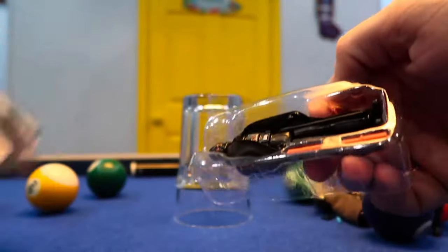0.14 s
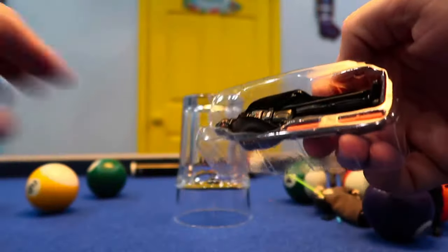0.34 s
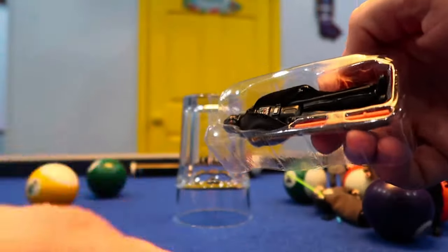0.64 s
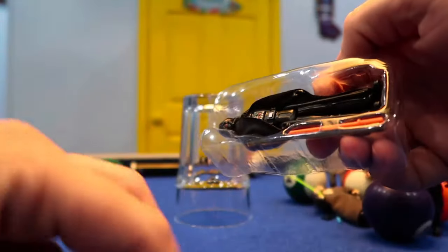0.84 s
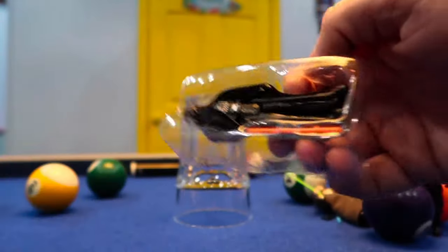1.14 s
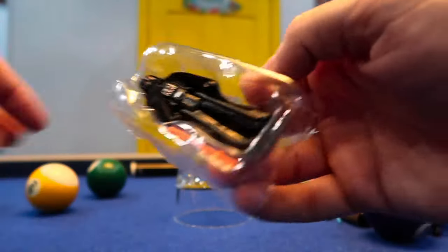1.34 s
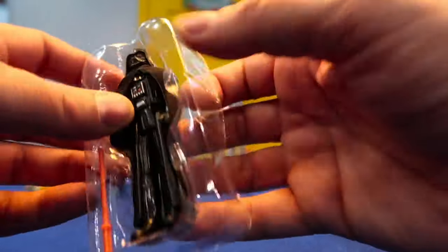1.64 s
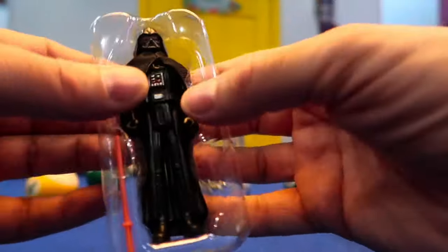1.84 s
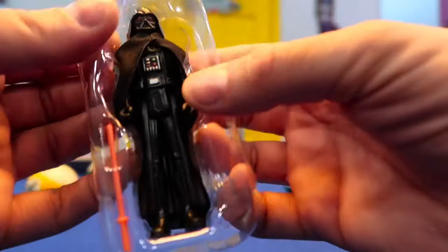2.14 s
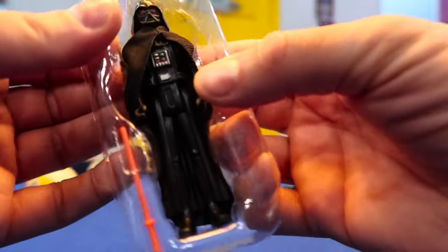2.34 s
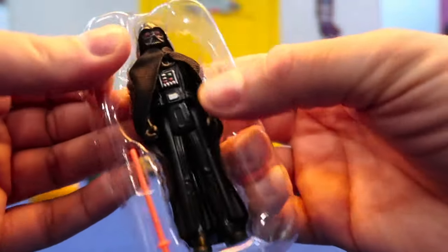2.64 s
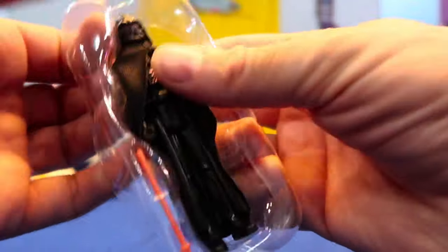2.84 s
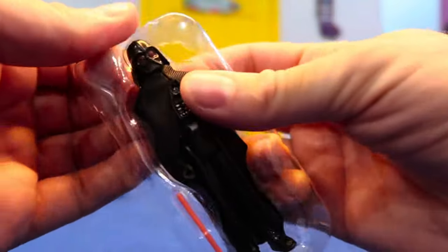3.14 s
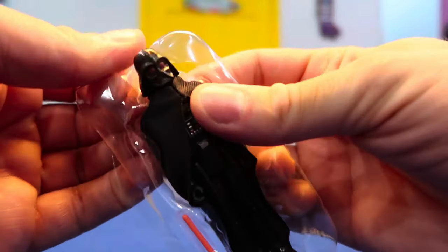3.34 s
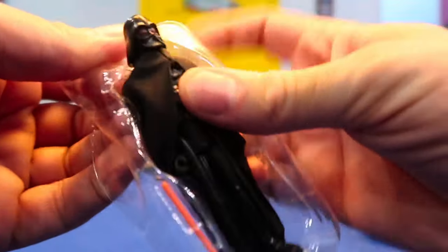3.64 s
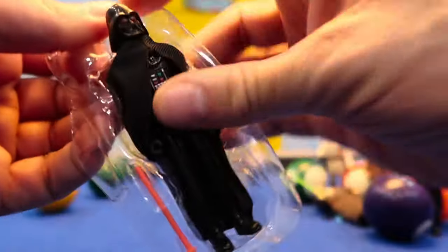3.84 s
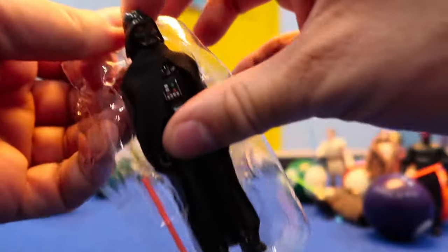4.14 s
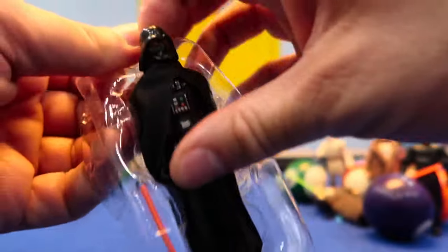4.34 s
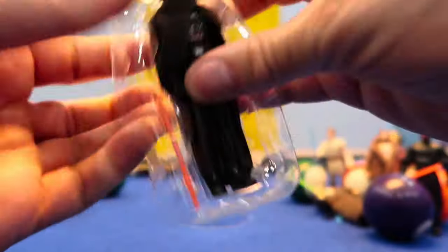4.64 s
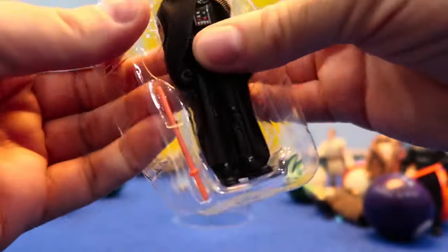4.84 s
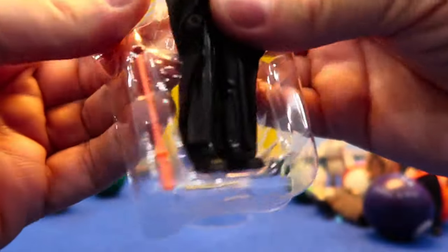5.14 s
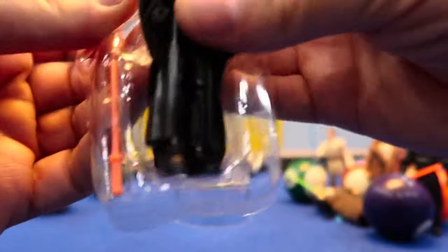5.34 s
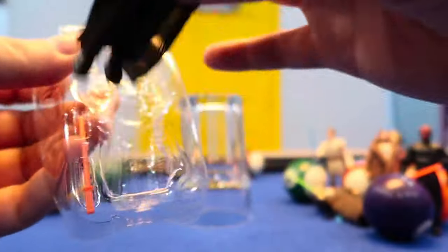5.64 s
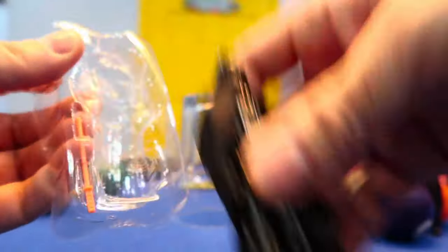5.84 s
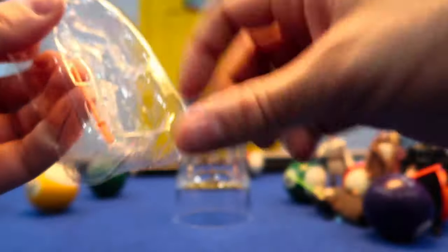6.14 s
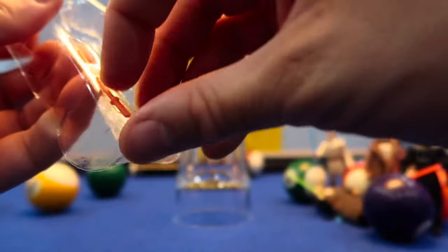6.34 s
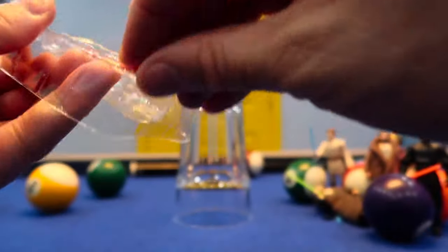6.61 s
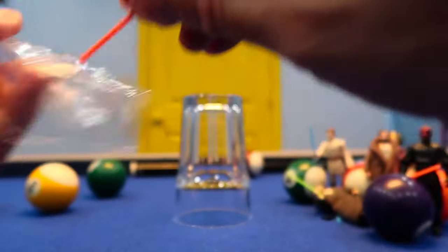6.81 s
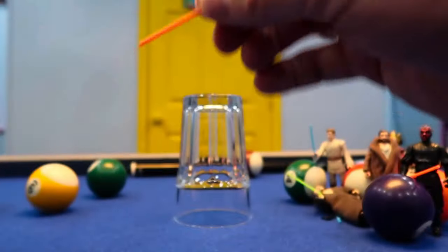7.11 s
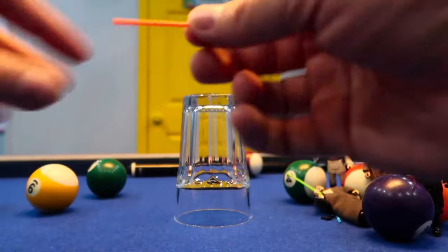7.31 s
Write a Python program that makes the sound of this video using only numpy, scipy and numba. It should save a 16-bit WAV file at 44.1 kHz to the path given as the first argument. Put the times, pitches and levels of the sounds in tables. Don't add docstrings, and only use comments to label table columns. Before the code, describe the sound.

In a small room with low ventilation rush and faint hum, a light lid clatters and knocks dully on a felt table, slightly left. A finger hisses briefly across the cloth, and the lid knocks again. Then a thin plastic shell is flexed close to the microphone: hard snaps, rapid stick-slip creaks and fine crackle in dense bursts, thinning to a few late clicks.

```python
import sys
import numpy as np
from scipy import signal
from scipy.fft import rfft, irfft, next_fast_len
from scipy.io import wavfile
from scipy.ndimage import uniform_filter1d
from numba import njit

SR = 44100
rng = np.random.default_rng(int(sys.argv[2]) if len(sys.argv) > 2 else 0)


def linear_from_db(decibels):
    return 10 ** (np.asarray(decibels, float) / 20)


def materialize(psi):
    bounded = np.clip(np.atleast_2d(psi).T, -1, 1)
    quanta = np.round(bounded * 32767).astype(np.int16)
    wavfile.write(sys.argv[1], SR, quanta)


N = 329556
TIME = np.arange(N) / SR


def colour(x, points):
    hz, db = np.transpose(points)
    size = x.shape[-1]
    f = np.arange(size // 2 + 1) * SR / size + 1
    return irfft(rfft(x) * linear_from_db(np.interp(np.log(f), np.log(hz), db)), size)


@njit
def ring(start, pole, rise, left, right):
    out = np.zeros((2, N))
    for g in range(len(start)):
        z, gap, i = 1. + 0j, 1., start[g]
        while abs(z) > 1e-3 and i < N:
            v = z * (1 - gap)
            out[0, i] += (v * left[g]).imag
            out[1, i] += (v * right[g]).imag
            z, gap, i = z * pole[g], gap * rise, i + 1
    return out


PORT_LEAD_RAD, PORT_LEAD_HZ, PORT_BEND, PORT_SCATTER = 2.92, 12300.0, 1.61, 0.6
RUN_POWER, PAN_SCATTER_DB = 3.0, -2


def strike(s, db, hz, t60_s, pan_db, spread_oct, tilt_db_oct, run_s, rise_s, count):
    u = rng.random((len(s), count + 1, 4))
    late = u[:, 1:, 0] ** RUN_POWER
    size = u[:, 1:, 2]
    phase = np.exp(2j * np.pi * u[:, 1:, 3])
    octave = spread_oct * (2 * (np.arange(count) + u[:, 1:, 1]) / count - 1)
    f = np.clip(hz[:, None] * 2 ** octave, 30, .45 * SR)

    side = 1 + PORT_SCATTER * np.sqrt(3) * (2 * u[:, :1, 0] - 1)
    lead = np.exp(.5j * side * PORT_LEAD_RAD * (f / PORT_LEAD_HZ) ** PORT_BEND)
    pan = linear_from_db((pan_db + PAN_SCATTER_DB * (2 * u[:, 0, 1] - 1)) / 2)[:, None]
    mode_db = db[:, None] - 9.4 * size + tilt_db_oct * np.abs(octave)
    gain = phase * linear_from_db(mode_db) * 2.566 / np.sqrt(count)

    decay = np.log(1000) * 2 ** (0.086 * octave) / (np.clip(t60_s, .001, .4) * SR)
    pole = np.exp(2j * np.pi * f / SR - decay)
    rise = np.exp(-1 / (rise_s * SR))
    start = ((s[:, None] + run_s * late) * SR).astype(np.int64)
    left, right = gain * lead * pan, gain / lead / pan
    return ring(start.ravel(), pole.ravel(), rise, left.ravel(), right.ravel())


def shell(s, panel_db, panel_hz, belly_db, edge_db, count):
    panel = strike(s, panel_db + 2.0, panel_hz, t60_s=0.013, pan_db=0.36, spread_oct=0.99,
                   tilt_db_oct=-12.5, run_s=.0022, rise_s=.0001, count=count)
    belly = strike(s, belly_db + 5.0, 750 + 0 * s, t60_s=0.012, pan_db=0.43, spread_oct=1.0,
                   tilt_db_oct=-9.0, run_s=0.002545, rise_s=0.0003, count=count)
    edge = strike(s, edge_db + 4.0, 5500 + 0 * s, t60_s=0.006, pan_db=0.5, spread_oct=1.168,
                  tilt_db_oct=-2.5, run_s=0.0014, rise_s=.00006, count=count)
    return panel + belly + edge


# t/s, peak level/dB, panel
# f/Hz, edge re panel/dB
TICKS = [(1.823, -22.5, 2720, 4), (1.953, -16, 2240, -11), (1.9928, -17.5, 2930, -8),
         (2.056, -22, 2580, -15), (2.133, -13.5, 2280, -11), (2.2932, -19.5, 2220, -3),
         (2.6036, -10, 2340, -21), (2.7247, -32, 2110, 14.5), (2.8961, -12, 2003, -21),
         (3.0254, -19, 2150, -24.5), (3.2729, -9.5, 2872, -12), (3.403, -20.5, 2554, -4.5),
         (3.4303, -16.5, 3180, -9), (3.4801, -12.5, 2670, -20.5), (3.8257, -12.5, 3920, -39),
         (3.943, -20, 2213, -10.5), (4.0173, -21.5, 2260, -6), (4.0466, -14, 2190, -23),
         (4.0965, -24, 2174, -4.5), (4.6706, -17.5, 2025, -18), (4.704, -21.5, 2240, -11),
         (4.7883, -20, 2546, -1.5), (4.991, -13.5, 3560, -16), (5.007, -16.5, 2500, -13.5),
         (5.0692, -17, 2950, -1.5), (5.2651, -10.5, 3210, -20), (5.3551, -20, 3000, -6),
         (5.506, -21, 2780, 2), (5.5135, -13.5, 2730, -4.5), (5.651, -23.5, 2220, -6.5),
         (5.8992, -41, 2440, -18), (6.0542, -23.5, 2900, -9), (6.1897, -32.5, 2960, -20),
              (6.3335, -45.5, 2342, -15), (6.588, -37.5, 2407, -5), (6.6238, -16.5, 4190, 4),
              (6.7897, -12, 2880, -10), (6.8105, -18.5, 1530, -26), (5.617, -10.5, 2184, -30),
              (6.9411, -9, 2220, -14.5), (6.9824, -10.5, 2940, -2), (7.0588, -13, 2120, -20)]
TICK_BELLY_DB, BELLY_PER_DB, BELLY_SCATTER_DB = -17.5, -0.15, 18.5


def ticks():
    s, db, hz, edge_db = np.transpose(TICKS)
    belly_db = TICK_BELLY_DB + BELLY_PER_DB * db + BELLY_SCATTER_DB * (rng.random(len(s)) - .5)
    return np.transpose([s, db, hz, belly_db, edge_db])


# start t/s, length/s, slip rate/Hz, peak level/dB, edge re panel/dB
CREAKS = [(2.405, .04, 71, -28.5, -23.5), (2.462, .03, 80, -17, -28), (2.5052, .032, 117, -14.5, -18),
          (2.546, .04, 94, -20, -19), (2.67, .03, 157, -12.5, -11), (3.054, .01, 49, -9, -9.5),
          (3.0658, .024, 66.6, -14.5, -10), (3.138, .009, 186, -8, -19), (3.169, .036, 92, -13, -12.5),
          (3.222, .03, 45, -14, -2.5), (3.77, .045, 134, -41.5, 14), (3.849, .06, 47, -34, 8.5),
          (4.246, .065, 118, -20, -13), (4.38, .035, 133, -35, 7), (4.47, .035, 110, -31, -13),
          (4.847, .01, 70, -13, -8), (5.165, .03, 93, -15.5, -5.5), (5.4127, .01, 156, -12.5, -30)]
CREAK_HZ, CREAK_BELLY_DB, CREAK_SCATTER_DB, CREAK_UNEVEN = 2350, -12.5, 4.5, 0.15


def creaks(count=10):
    start, length, rate, db, edge_db = np.transpose(CREAKS)[:, :, None]
    u = rng.random((len(CREAKS), count, 4)) - .5
    slip = np.arange(count)
    late = (slip + CREAK_UNEVEN * u[..., 0] * (slip > 0)) / rate
    rows = [start + late,
            db + CREAK_SCATTER_DB * u[..., 1],
            CREAK_HZ * 2 ** (0.23 * u[..., 2]),
            CREAK_BELLY_DB + 12 * u[..., 3],
            edge_db + 0 * late]
    return np.stack(rows, axis=-1)[late < length]


# t/s, peak level/dB, panel f/Hz, belly re panel/dB, edge re panel/dB
SNAPS = [(1.5, -10, 3720, -13.5, -14), (1.604, 1, 2650, -16.5, -8), (1.707, -7, 2610, -12, -13),
         (2.322, -2.5, 2800, -16, -12), (2.3869, -3.5, 2320, -19.5, -5.5), (2.498, -10, 2460, -9.5, -5.5),
         (2.5898, -9.5, 2560, -18.5, -32), (2.7461, -12.5, 3560, -1, -10), (3.0457, -6, 2435, -10.5, -6),
         (3.1202, -6.5, 2300, -25, -24), (3.2893, 0.5, 2130, -8.5, -2.5), (3.4922, -8.5, 3930, -26, -6),
         (3.5917, -5, 1754, -13, -6.5), (3.6984, -19.5, 1910, 2.5, -1.5), (4.1536, -6.5, 2200, -24.5, -5.5),
         (4.5145, -1.5, 2026, -10, -6), (4.5983, -12, 3080, -13, -6.5), (4.72, -5, 2140, -17, -13.5),
         (4.821, -15, 2670, -2, 0.5), (4.878, -7, 2350, -12.5, -8.5), (5.018, -3, 3056, -25.5, -8),
         (5.4033, -9.5, 3190, -15, -0.5), (5.453, -12, 2185, -14, -12), (5.6072, -8.5, 2140, -22, -13.5)]


def snaps():
    s, db, hz, belly_db, edge_db = np.vstack([SNAPS, ticks(), creaks()]).T
    u = rng.random((len(s), 2))
    slip_s = s - .002 - 0.0031 * u[:, 1]
    slip_db = db - 17 - 12 * u[:, 0]
    slip = shell(slip_s, slip_db, hz, slip_db + belly_db, slip_db + edge_db, count=5)
    return slip + shell(s, db, hz, db + belly_db, db + edge_db, count=14)


# t/s, peak level/dB, panel f/Hz, belly re panel/dB, edge re panel/dB
CRINKLES = [(1.484, -29.5, 1820, -6, -15), (1.5901, -17, 3020, -10.5, -22.5), (1.888, -32, 3010, -9, -11.5),
            (1.936, -29, 2930, -1, 1), (1.978, -24, 1970, 1, -11.5), (2.113, -31, 1720, 5, -24),
            (2.1785, -23, 2090, -10.5, -27), (2.1826, -20.5, 1960, -1, -30),
            (2.207, -20.5, 3080, -15.5, -5), (2.222, -19.5, 2130, -12, -18.5),
            (2.2605, -29, 2980, -13.5, -6.5), (2.797, -14.5, 1870, -4.5, -20.5),
            (2.8093, -26.5, 2150, -8.5, -16), (2.831, -20.5, 2200, -13, -20), (2.872, -22, 1780, -4, -23),
            (2.9177, -26.5, 1810, 0, -23), (2.996, -36, 2160, -3.5, -14.5), (3.035, -13.5, 1990, -13, -36),
            (3.102, -12, 3310, -20.5, -15.5), (3.1543, -18.5, 2680, -4, -21),
            (3.4114, -20, 3050, -18, -10.5), (3.42, -23.5, 2500, -7.5, -4.5),
            (3.4605, -20, 1990, -7.5, -22), (3.4752, -9.5, 2400, -16, -10), (3.5122, -22, 2430, -17, -3),
            (3.547, -29, 3260, -19, 4), (3.6318, -16.5, 2170, -19.5, -4.5), (3.653, -23.5, 2200, -9, -12.5),
            (3.6673, -23, 2150, -4, -10), (3.676, -17.5, 2280, -2, -17), (3.7396, -23.5, 1990, -20, -20),
            (4.137, -25.5, 2040, -18, -16), (4.29, -15.5, 2240, -3, -18), (4.294, -15.5, 3400, -12.5, 1.5),
            (4.4258, -18.5, 1980, -23.5, -17), (4.4462, -20.0, 1990, -15, -12),
            (4.498, -13.5, 2160, -17, -9), (4.5088, -8.5, 2240, -18, -19.5),
            (2.7, -7, 2450, -6, -12), (2.714, -13, 2280, -10, -22.5), (4.561, -23, 2680, -11, -9),
                 (4.5658, -15.5, 2470, -16, -9), (4.606, -14, 2013, -16, -17), (4.6156, -19, 2270, 1, -18),
                 (4.6373, -20, 1970, -2.5, -16), (4.651, -16.5, 1980, -12.5, -23),
                 (4.8619, -6, 2620, -19.5, -7.5), (4.888, -14.5, 2160, -17, -18),
                 (4.913, -21, 2310, -18, -15), (4.9533, -23.5, 2350, -23.5, -22),
                 (4.9668, -19, 2470, -11.5, -20), (4.978, -19, 2600, -16, -26.5),
                 (5.014, -9.5, 3570, -22, -7), (5.0297, -16, 2440, -12.5, -18),
                 (5.08, -17, 2710, -26.5, -22), (5.09, -19.5, 2590, -22, -21),
                 (5.1113, -22, 2350, -15.5, -17), (5.1205, -21, 2277, -17, -21),
                 (5.1516, -15, 2340, -19, -19), (5.186, -21.5, 2350, -22, -4), (5.231, -24, 2327, -25, -15),
                 (5.2757, -18, 2400, -8.5, -8), (5.3144, -26.5, 3010, -16, -8),
                 (5.3487, -18.5, 2670, -18, -13), (5.364, -26, 3270, -24, -7),
                 (5.4758, -15.5, 1890, -20.5, -13), (5.483, -24.0, 1960, -9, -12),
                 (5.5466, -20, 2960, -0.5, -9), (5.6371, -29, 1880, 10, -8), (6.6005, -32.0, 2460, -3, -5),
                 (6.8211, -31, 3300, -8, -8), (6.834, -20, 2560, -15, -6), (6.845, -30, 1940, -15, -15),
                 (6.8728, -18, 2650, -25, -13), (7.166, -34, 2860, -5, -8), (7.341, -24.5, 3040, -17, -9)]
CRINKLE_DB = -3


def crinkles():
    s, db, hz, belly_db, edge_db = np.transpose(CRINKLES)
    db = db + CRINKLE_DB
    return shell(s, db, hz, db + belly_db + 3.0, db + edge_db + .7, count=10)


# start t/s, hold/s, level/dB, brightness/dB
SQUEEZES = [(1.487, 0.12, -30, -2), (1.755, 0.093, -26.5, 0), (1.915, 0.109, -30.5, -4),
            (2.166, 0.037, -26.5, -4), (2.289, 0.05, -19, -3), (2.43, 0.084, -27.5, 7.5),
            (2.691, 0.023, -16.5, 1.5), (2.77, 0.0308, -26, -4), (2.994, 0.051, -24.5, -3),
            (3.175, 0.057, -29, 3), (3.425, 0.087, -30, 5), (3.6, 0.07, -22, 8.5), (3.753, .12, -25, 6),
            (4.01, 0.051, -32.5, -5), (4.147, 0.12, -32, 9.5), (4.314, 0.14, -37.5, 13),
            (4.445, 0.16, -24, 2), (4.799, 0.24, -28, 2.5), (5.023, 0.2, -29.5, 1),
            (5.164, 0.058, -27, 13.5), (5.313, 0.026, -30, 10.5), (5.46, 0.081, -26, -5),
            (5.629, 0.064, -35, 2), (6.057, 0.026, -38.5, -4), (6.607, 0.039, -26.5, -4),
            (6.79, 0.044, -23, 3.5), (6.99, 0.16, -28, 1.5), (7.345, 0.031, -33, 2)]
SQUEEZE_RISE_DB_S, SQUEEZE_FALL_DB_S = 598.5, 155.5
FINE_BELLY_DB, FINE_EDGE_DB, BELLY_PER_BRIGHT = -6.5, -17, -0.34


def crackle(count=1400):
    start, hold, db, bright_db = np.transpose(SQUEEZES)[:, :, None]
    u = rng.random((count, 5))
    s = start[0] + (N / SR - start[0]) * u[:, 0]
    size_db = -3.3 * np.log(1 - .97 * u[:, 1]) - 7
    rise_db = SQUEEZE_RISE_DB_S * np.maximum(start - s, 0)
    fall_db = SQUEEZE_FALL_DB_S * np.maximum(s - start - hold, 0)
    grip_db = db - rise_db - fall_db

    def heard(more_db):
        return 20 * np.log10(linear_from_db(grip_db + more_db).max(axis=0)) + size_db

    panel_db = heard(0)
    belly_db = heard(FINE_BELLY_DB + BELLY_PER_BRIGHT * bright_db) + 6 * u[:, 3] - 3
    edge_db = heard(FINE_EDGE_DB + bright_db) + 12 * u[:, 4] - 6
    return shell(s, panel_db, 2000 * 2 ** (0.39 * u[:, 2]), belly_db, edge_db, count=6)


# t/s, peak level/dB, f/Hz
FLICKS = [
    (.318, -31, 10500),
    (2.953, -30, 6400),
    (3.316, -16.5, 6350),
    (3.987, -27.5, 6500),
    (4.058, -27.5, 6460),
    (4.311, -17.5, 5400),
    (4.752, -25, 6500),
    (5.327, -22, 6530),
    (6.875, -21.5, 6430),
]


def flicks():
    s, db, hz = np.transpose(FLICKS)
    return strike(s, db + 1, hz, t60_s=0.0036, pan_db=0.3967, spread_oct=.9,
                  tilt_db_oct=1.5, run_s=0.00068, rise_s=.00006, count=12)


RUB_S, RUB_LENGTH_S, RUB_HZ, RUB_DB = 5.17, 0.093, 7430, -39


def rub():
    hiss = colour(rng.standard_normal(N), [(RUB_HZ / 1.8, -25), (RUB_HZ, 0), (RUB_HZ * 1.12, -20)])
    stroke = np.sin(np.pi * np.clip((TIME - RUB_S) / RUB_LENGTH_S, 0, 1)) ** .5
    return hiss / np.std(hiss) * linear_from_db(RUB_DB) * stroke


# t/s, peak level/dB, f/Hz, upper re lower ring/dB
LID = [(0.212, -41, 447, -3.5), (0.274, -25.5, 443, -11), (0.339, -18, 1200, -40), (0.355, -14.5, 676, -8),
       (0.38, -34, 910, -32), (0.429, -12, 586, -0.5), (0.447, -25, 1000, -4.5), (0.615, -15, 650, -1),
       (0.655, -27, 655, -7.5), (1.224, -35.5, 492.2, 0.5), (1.238, -28, 706.4, 0.5),
       (1.3, -28.5, 672.5, -5), (1.325, -12.5, 534, -7), (1.354, -16, 738, -2.5), (1.397, -25.5, 748, -4),
       (6.021, -37, 913, -27), (7.087, -28.5, 944, 0), (7.118, -26.5, 1176, 1), (7.134, -24, 940, -7),
       (7.255, -29.5, 1335, -15), (7.268, -27, 530, -9), (7.341, -33, 570, 6), (7.352, -31, 543, -3),
       (7.395, -36, 866, -21)]
# f/Hz, level/dB
LID_DULL = [(2300, 0), (3200, -4), (7000, 5.5), (11000, -31)]


def lid():
    s, db, hz, upper_db = np.transpose(LID)
    lower = strike(s, db + 5.5, hz, t60_s=0.027, pan_db=3.8, spread_oct=1.058,
                   tilt_db_oct=-14.5, run_s=0.00461, rise_s=0.000087, count=16)
    upper = strike(s, db + upper_db + 5, 1200 + 0 * s, t60_s=0.009, pan_db=4.5, spread_oct=0.9,
                   tilt_db_oct=-4, run_s=0.004, rise_s=0.00012, count=14)
    crack = strike(s, db + upper_db - 0.5, 2500 + 0 * s, t60_s=0.0064, pan_db=3.5, spread_oct=0.96,
                   tilt_db_oct=-13.0, run_s=0.00096, rise_s=.0001, count=10)
    left, right = colour(lower + upper + crack, LID_DULL)
    return np.array([left, np.roll(right, 2)])


# t/s, peak level/dB, f/Hz
KNOCKS = [(0.275, -17, 220), (0.35, -10.5, 317), (0.43, -2.5, 238.4), (0.616, -19, 251.5),
          (0.652, -27.5, 277), (1.235, -19.5, 313), (1.323, -33.5, 330), (1.707, -18.5, 184),
          (1.995, -13.5, 142.5), (2.133, -25, 357), (2.289, -31.5, 274), (2.321, -20, 192),
          (2.701, -15.5, 310), (2.796, -16.5, 121.4), (3.047, -20.5, 242), (3.593, -31.5, 352),
          (3.696, -24, 228), (4.095, -29.5, 210), (4.299, -18, 185.8), (4.613, -26.5, 288.6),
          (5.016, -24, 90.55), (5.452, -29, 120), (5.998, -21, 205.6), (6.102, -20, 200), (7.113, -35, 295),
          (6.621, -27, 321.4), (7.268, -30, 316), (6.191, -33.5, 398)]
THUMP_DB, THUMP_HZ = -30, 310


def knocks():
    jolts = [(s, db + THUMP_DB, THUMP_HZ) for s, db, *_ in SNAPS]
    s, db, hz = np.transpose(KNOCKS + jolts)
    return strike(s, db + 2, hz, t60_s=.05, pan_db=.3, spread_oct=1.4,
                  tilt_db_oct=-8, run_s=.002, rise_s=.0008, count=10)


# t/s, level/dB
SLIDE = [
    (.68, -90),
    (.75, -55),
    (.895, -58),
    (.905, -50.5),
    (1.0, -44.5),
    (1.04, -77),
]
# t/s, peak level/dB
SLIDE_TICKS = [
    (0.901, -13.5),
    (1, -20),
]


def slide():
    hiss = colour(rng.standard_normal((2, N)),
                  [(500, -14), (3000, 3), (6000, 0.5), (12000, -6.5), (16000, -13.5)])
    s, db = np.transpose(SLIDE_TICKS)
    catches = strike(s, db, 5000 + 0 * s, t60_s=0.0027, pan_db=1.5, spread_oct=1.33,
                     tilt_db_oct=-7.0, run_s=0.0058, rise_s=.0001, count=14)
    return catches + hiss * linear_from_db(np.interp(TIME, *np.transpose(SLIDE), left=-120, right=-120))


# f/Hz, t60/s, level/dB
ROOM = [(167.3, 0.65, -8.5), (465, 0.31, -11), (1200, 0.57, -12.5), (2350, 0.45, -21), (4200, 0.26, -14),
        (8000, 0.043, -13)]
# f/Hz, level/dB
ECHO = [(1000, -1.5), (1500, -2), (2300, 0.5), (3500, -0.5), (6000, 1)]
SMEAR_HZ, WANDER_HZ = 260, 900


def room(x, low):
    t, out = TIME[:SR // 2], 0
    for hz, t60_s, db in ROOM:
        band = [(hz / 3, -30), (hz, 0), (hz * 48.0, -30)]
        mid, side = colour(rng.standard_normal((2, len(t))), band)
        onset = 1 - np.exp(-t / 0.0012)
        fade = linear_from_db(db + 3.5 - 60 * t / t60_s) * onset / np.sqrt(t60_s * SR / 14)
        out = out + fade * (mid + min(hz / 5000, 1) * side * np.array([[1], [-1]]))
    wander = uniform_filter1d(rng.standard_normal(N), size=SR // WANDER_HZ) * np.sqrt(SR / WANDER_HZ)
    turn = np.exp(2j * np.pi * SMEAR_HZ * np.cumsum(wander) / SR)
    blurred = (signal.hilbert(x, next_fast_len(N))[:N] * turn).real
    return signal.fftconvolve((colour(blurred, ECHO) + low)[None], out, axes=1)[:, :N]


# f/Hz, density level/dB
AIR = [(15, -51), (25, -28), (69, -3.5), (450, -7), (543, -16.5), (1150, -17), (6040, -32), (13500, -44)]
# f/Hz, side re mid/dB
AIR_SIDE = [(100, -18), (400, -5), (2400, -7), (12000, 7)]
# t/s, level/dB
GAIN = [
    (0, 0.5),
    (1.2, 0),
    (3.0, -2),
    (3.5, -12.5),
    (5.5, -13.5),
    (7.47, -2),
]
AIR_DB, HUM_HZ, HUM_DB, WHINE_HZ, WHINE_DB = -48, 118, -53.5, 13006, -83


def air():
    mid, side = colour(rng.standard_normal((2, N)), AIR)
    side = colour(side, AIR_SIDE)
    rush = np.array([mid + side, mid - side]) * linear_from_db(AIR_DB) / np.std(mid)
    sway = uniform_filter1d(rng.standard_normal(N), SR // 10) * np.sqrt(SR / 10)
    hum = linear_from_db(HUM_DB + 3 + 1.5 * sway) * np.sin(2 * np.pi * HUM_HZ * TIME)
    whine = linear_from_db(WHINE_DB + 3) * np.sin(2 * np.pi * WHINE_HZ * TIME)
    return (rush + hum + whine) * linear_from_db(np.interp(TIME, *np.transpose(GAIN)))


# t/s, left re right/dB
SHELL_PAN = [
    (6.0, -1.5),
    (6.5, 1),
    (7.47, 0),
]
# f/Hz, level/dB
CLOSE = [(40, -11), (100, -7.5), (200, 1)]
HIDDEN_DB = 7.5
LID_FAR_DB = 11.5


def scene():
    pan_db = np.interp(TIME, *np.transpose(SHELL_PAN))
    pan = linear_from_db(np.array([pan_db, -pan_db]) / 2)
    near = colour(pan * snaps(), CLOSE) + pan * crinkles() + flicks() + rub() + slide()
    fine = colour(pan * crackle(), CLOSE)
    far = colour(lid(), CLOSE)
    low = colour(knocks(), CLOSE)
    to_walls = near + linear_from_db(HIDDEN_DB) * fine + linear_from_db(LID_FAR_DB) * far
    echo = room(to_walls.mean(axis=0), low.mean(axis=0))
    return near + low + fine + far + echo + air()


def low_pass(x):
    return signal.sosfilt(signal.butter(12, 16390, fs=SR, output="sos"), x)


# f/Hz, level/dB
MIC = [(300, -1), (420, -4.5), (1000, 0.5), (1550, -1.5), (2200, 0.5), (12000, -1), (15000, 0.5),
       (17000, -30.5)]
MIC_PAN_DB = .8


def record(dry):
    balance = linear_from_db([[MIC_PAN_DB / 2], [-MIC_PAN_DB / 2]])
    mix = np.clip(colour(dry, MIC) * balance, -1, 1)
    return low_pass(mix)


dry = scene()
out = record(dry)
materialize(out)
```